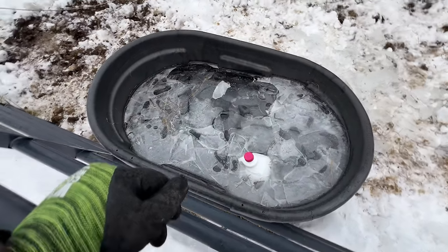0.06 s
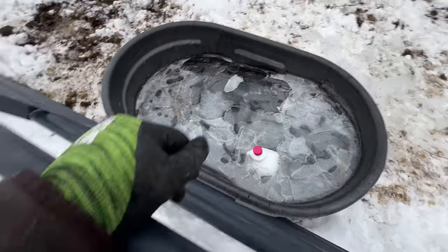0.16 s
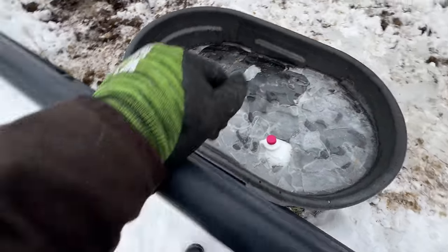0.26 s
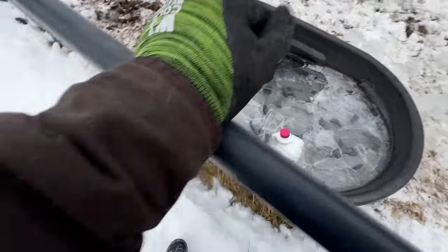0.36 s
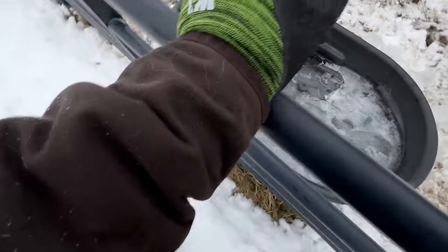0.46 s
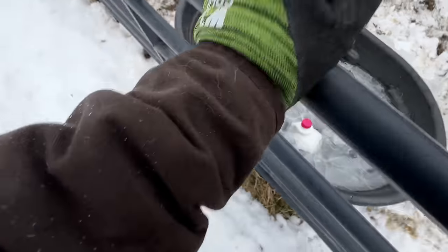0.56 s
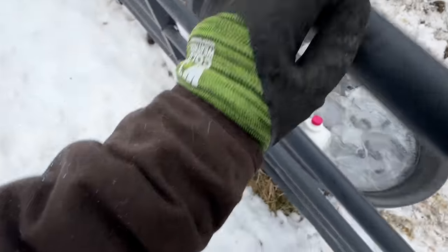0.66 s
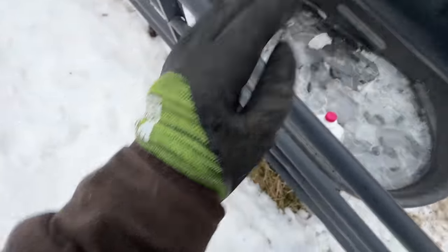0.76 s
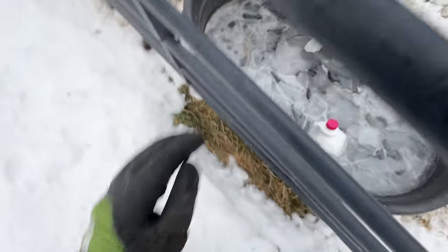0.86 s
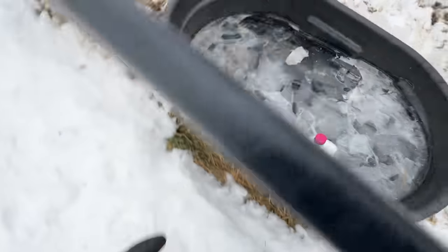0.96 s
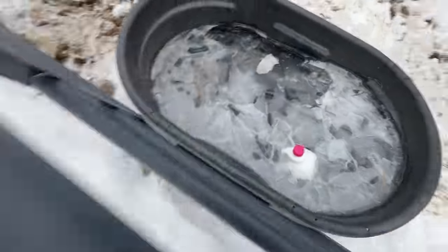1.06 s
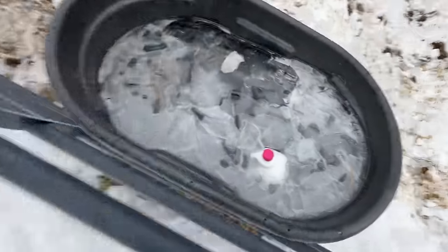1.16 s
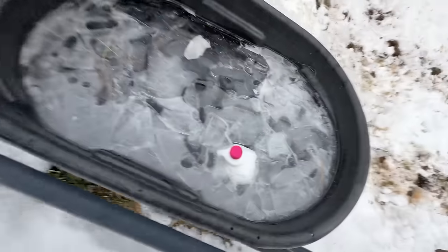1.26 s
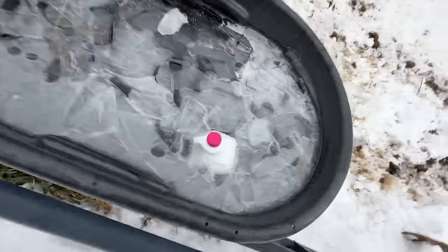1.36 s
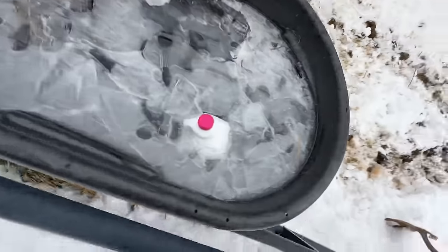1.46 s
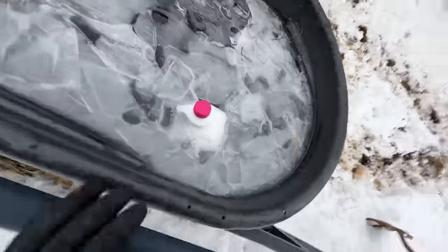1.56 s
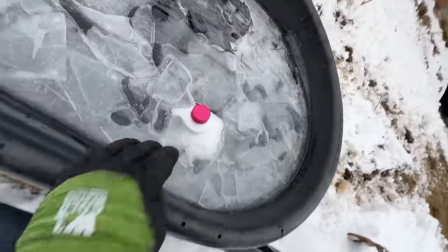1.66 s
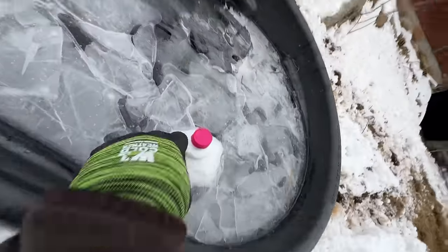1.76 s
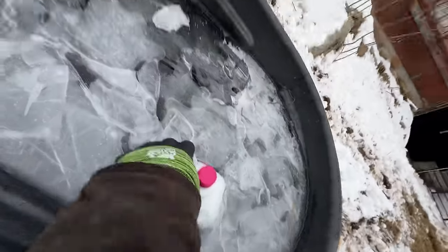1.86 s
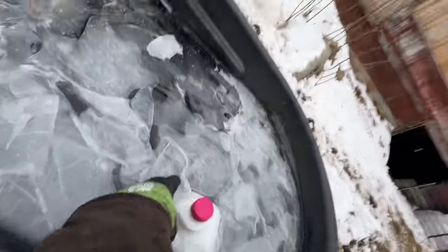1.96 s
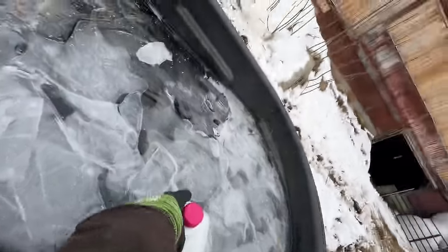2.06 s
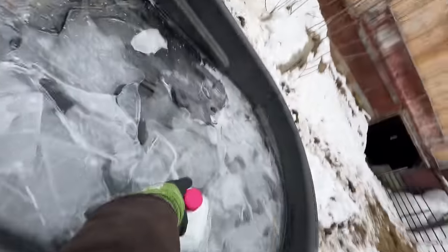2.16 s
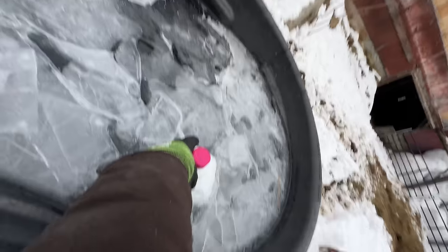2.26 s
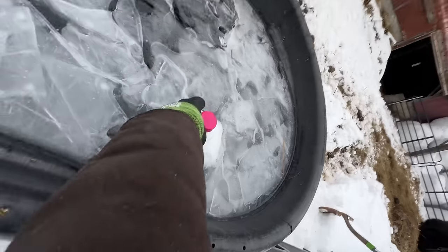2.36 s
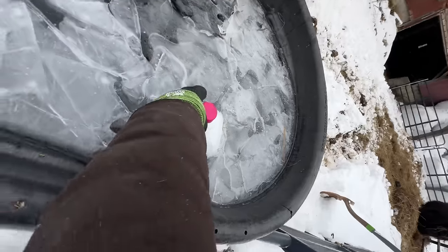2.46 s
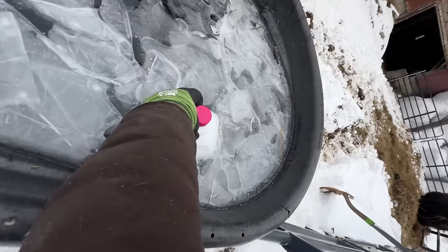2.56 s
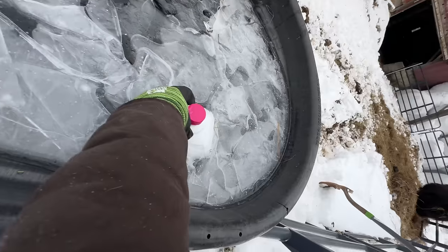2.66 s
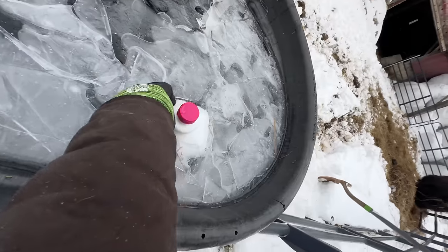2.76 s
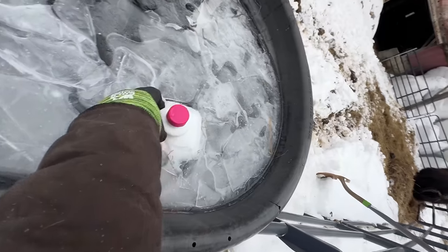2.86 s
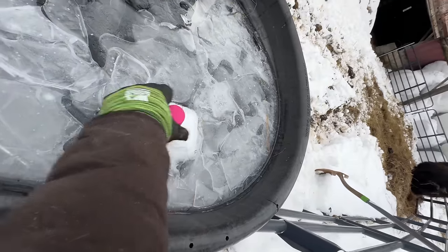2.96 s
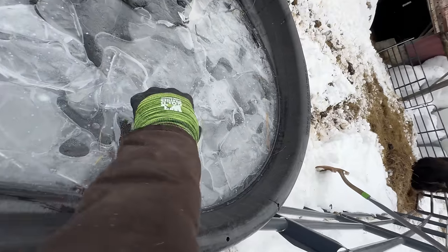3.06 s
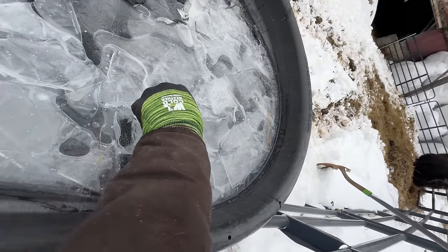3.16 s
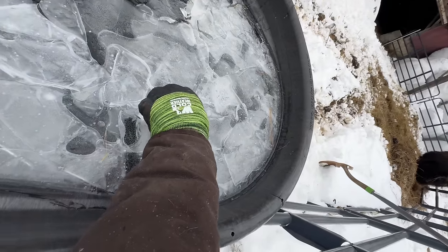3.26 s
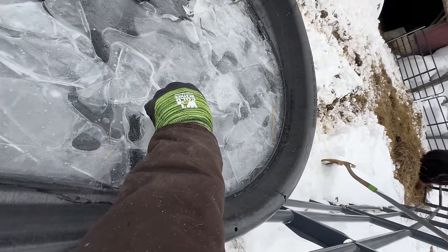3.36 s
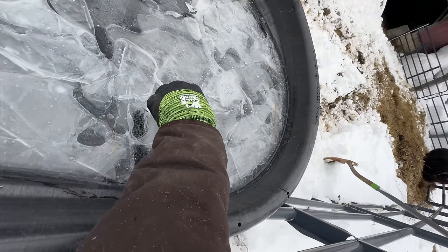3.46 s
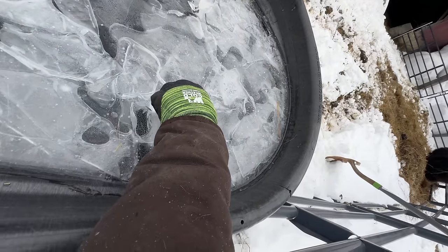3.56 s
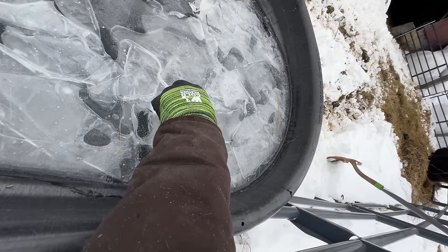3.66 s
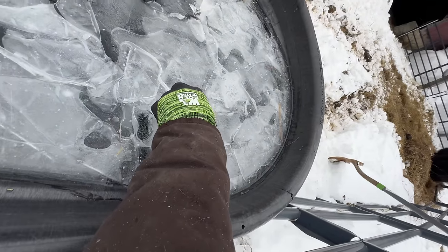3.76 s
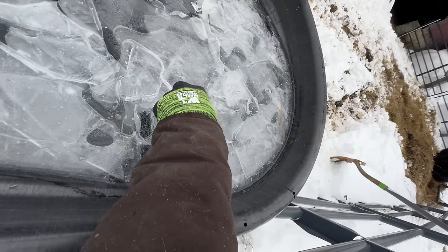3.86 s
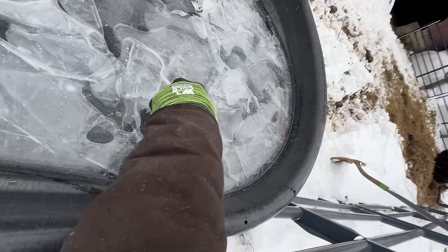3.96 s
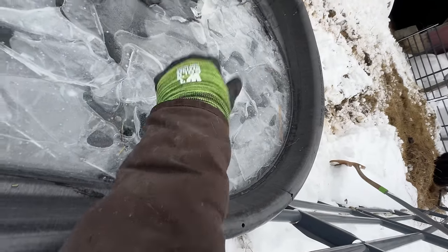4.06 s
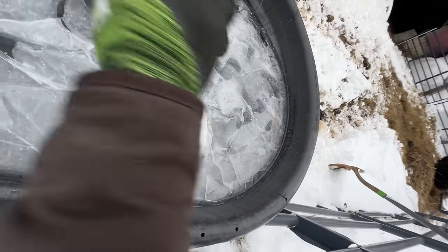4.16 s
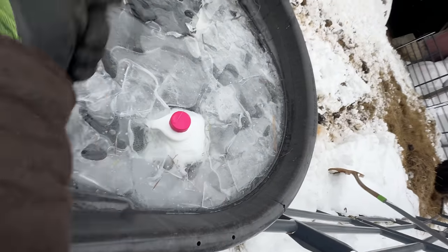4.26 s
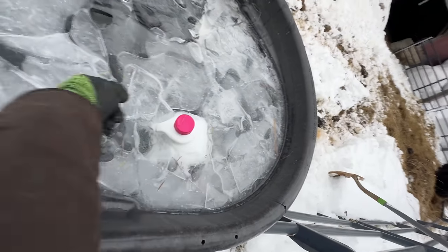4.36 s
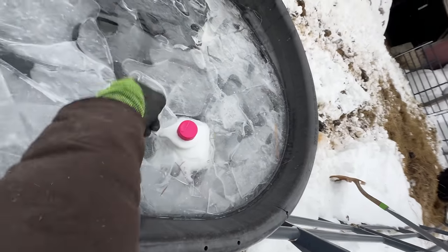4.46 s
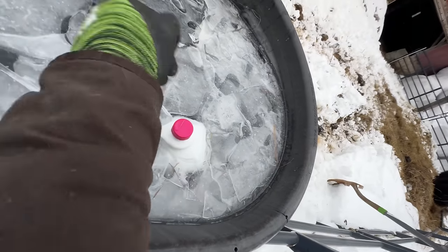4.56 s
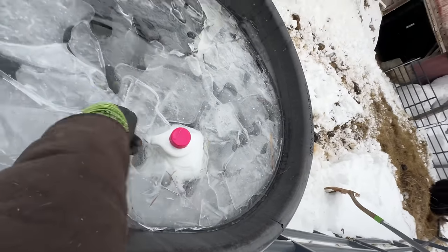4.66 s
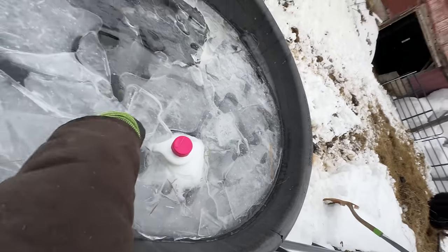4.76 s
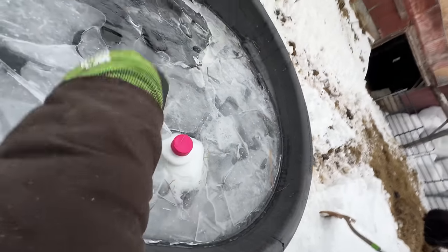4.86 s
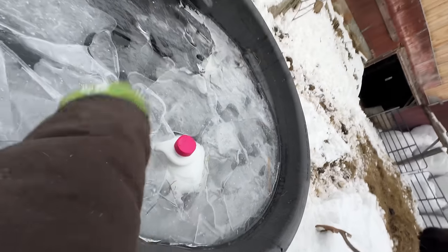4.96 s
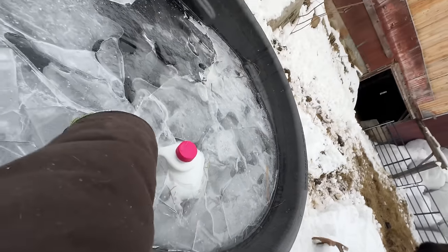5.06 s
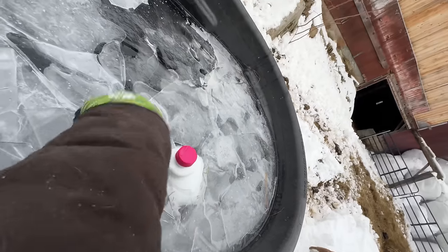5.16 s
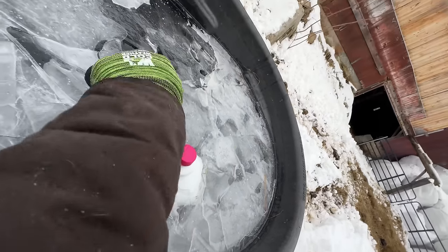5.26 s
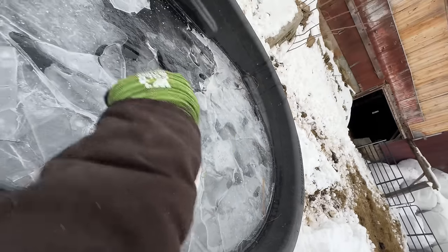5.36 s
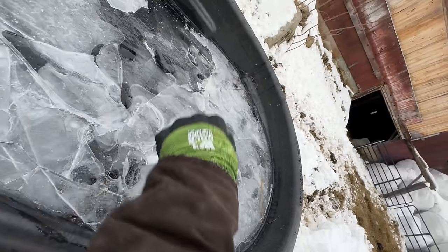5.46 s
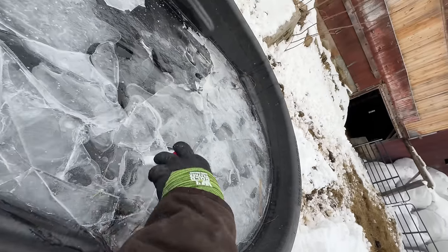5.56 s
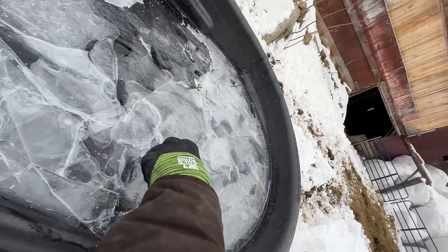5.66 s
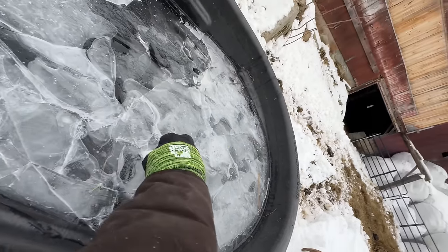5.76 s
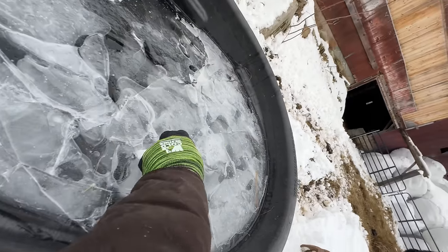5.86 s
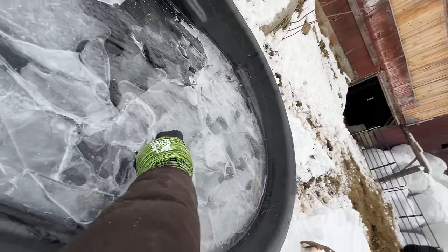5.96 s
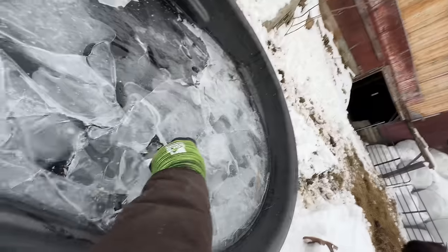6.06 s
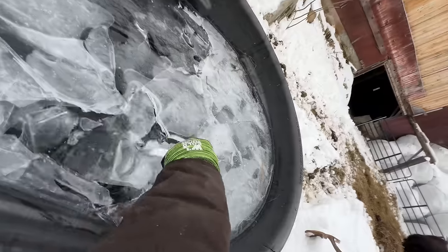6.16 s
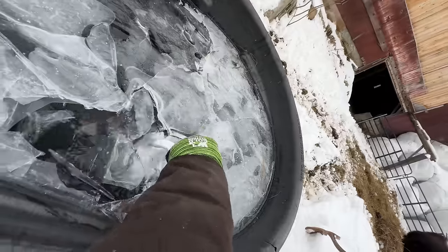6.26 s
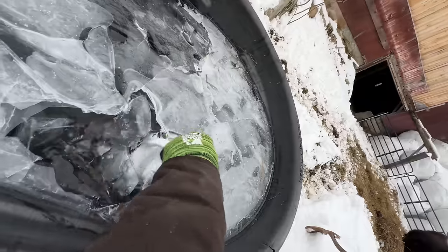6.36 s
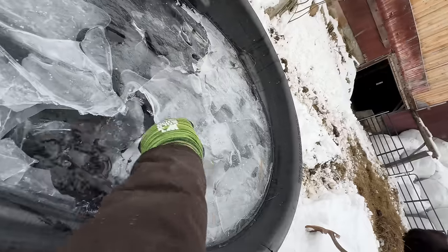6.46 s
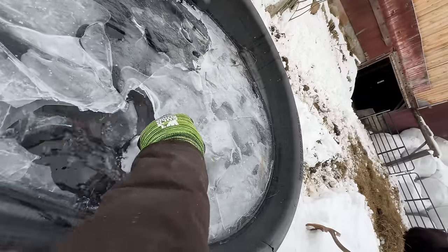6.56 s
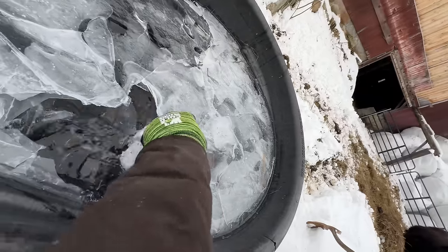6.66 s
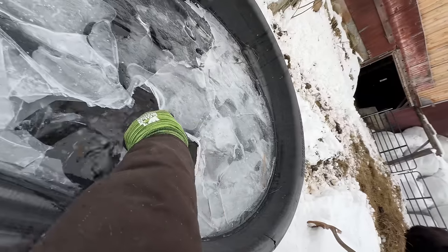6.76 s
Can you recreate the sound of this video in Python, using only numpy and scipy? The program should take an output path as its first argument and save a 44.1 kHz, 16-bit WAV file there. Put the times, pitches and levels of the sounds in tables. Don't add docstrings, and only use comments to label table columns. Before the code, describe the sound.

A sleeve and glove rustle and tap close by, a jug squeaks briefly, then three hard blows crack trough ice into clinking, sloshing slabs.

```python
import sys
import numpy as np
from scipy import signal
from scipy.fft import rfft, irfft, next_fast_len
from scipy.io import wavfile
from scipy.ndimage import uniform_filter1d

SR = 44100
rng = np.random.default_rng(int(sys.argv[2]) if len(sys.argv) > 2 else 0)


def boost(x):
    u = np.asarray(x, float) / 20
    return 10 ** u


def output_pcm(signal):
    pcm = np.clip(np.atleast_2d(signal).T, -1, 1) * 32767
    wavfile.write(sys.argv[1], SR, np.round(pcm).astype(np.int16))


N = 300762

# time_s, level_db
RUB_EFFORT = [(0.0, -59), (0.23, -48.5), (0.5, -50), (0.63, -47), (0.83, -44), (1.05, -43.5), (1.1, -56.5),
              (1.3, -59), (1.5, -59), (1.6, -46.5), (1.8, -47), (2.33, -53), (2.69, -51.5), (2.8, -45.5),
              (3.12, -51.5), (3.42, -53), (3.6, -59), (4.0, -51.5), (4.35, -47)]
# start_s, peak_db, t60_s, brightness_db
SCUFF_EVENTS = [(0.275, -38, 0.12, -4), (0.551, -54.5, 0.51, 29), (0.6994, -41, 0.15, 4),
                (0.96, -44, 0.083, 20), (1.003, -44, 0.33, 23), (1.137, -22.5, 0.14, -2),
                (1.1505, -24.5, 0.26, -0.5), (1.264, -18.5, 0.17, -1), (1.2825, -34, 0.08, 1),
                (1.332, -19.5, 0.14, -1.5), (1.382, -21, 0.33, -2.5), (1.439, -25, 0.16, 8),
                (1.485, -22.5, 0.12, -2.5), (1.582, -31.5, 0.045, 10.5), (1.9749, -40, 0.2, -8),
                (2.097, -35.5, 0.17, 2), (2.5, -44.5, 0.25, -18), (2.98, -33.5, 0.21, 7),
                (3.1074, -25.5, 0.083, -4), (3.146, -28.5, 0.12, -6), (3.2932, -41, 0.084, -6),
                (3.361, -29, 0.067, 6.5), (3.495, -30.5, 0.052, 7), (3.598, -38.5, 0.44, -0.5),
                (4.068, -29, 0.093, 6)]
# frequency_hz, level_db
CLOTH_SPECTRUM = [(1000, 8), (1600, 1), (2600, 3), (4000, 1.5), (6500, -0.5), (9000, -2.5), (12000, -6),
                  (14000, -6), (16000, -2)]
# frequency_hz, density_db (per Hz)
SLEEVE_BODY_SPECTRUM = [(180, -12.5), (280, 1), (450, -3), (650, -5), (800, -12), (1000, -14)]
# frequency_hz, density_db (per Hz)
THUMP_SPECTRUM = [(25, -44), (45, 3.5), (80, -2), (125, -2.5), (200, -3)]
# start_s, peak_db, pitch_hz, t60_s
TAP_EVENTS = [(0.539, -59, 93, 0.11), (0.716, -33, 280, 0.25), (0.8, -31.5, 216, 0.11),
              (0.886, -34, 256.5, 0.056), (1.053, -35, 254, 0.097), (1.137, -29.5, 310, 0.055),
              (1.172, -28.5, 267, 0.11), (1.26, -26, 273, 0.09), (1.322, -29.5, 400, 0.2),
              (1.382, -28.5, 301, 0.15), (1.426, -30, 227, 0.15), (1.576, -35, 104, 0.074),
              (1.966, -30.5, 118.5, 0.28), (2.096, -38, 348, 0.045), (2.699, -30.5, 230, 0.45),
              (3.018, -40, 494, 0.3), (3.092, -35, 510, 0.089), (3.806, -29.5, 666, 0.026)]
# start_s, peak_db, pitch_hz, t60_s, upper_mode_tilt_db
BLOW_EVENTS = [(4.356, 0, 123, 0.19, 1.5), (4.682, 1.5, 350.8, 0.024, 2), (5.024, -1.5, 293, 0.068, -2),
               (5.031, -1.5, 106, 0.03, 0), (5.786, -27, 317, 1, -6), (5.939, 0, 179, 0.12, 0),
               (5.997, -5, 426, 0.097, 1.5), (6.018, -12, 345.4, 0.11, -10), (6.057, -16, 407, 0.16, 4),
               (6.2, -18.5, 153, 0.5, 10), (6.283, -14.5, 327, 0.25, 24), (6.401, -22.5, 144, 0.33, -9),
               (6.422, -28.5, 160, 0.14, 18.5), (6.501, -10.5, 153.6, 0.42, 1.5),
               (6.571, -16, 176, 0.23, 9), (6.685, -23, 416, 0.27, -3)]
# pitch_hz, level_db, t60_s
TUB_MODES = [(63.5, -26, 0.14), (119, -32, 0.093), (138, -8.5, 0.21), (193, -26, 0.1), (230, -0.5, 0.033),
             (297, -4, 0.057), (321.5, 3.5, 0.1), (363.4, -0.5, 0.15), (439, -8.5, 0.074),
             (526, -0.5, 0.038), (576, 5, 0.013), (609, 3, 0.025), (800, -9, 0.038), (900, -3.5, 0.076)]
# start_s, peak_db, pitch_hz, t60_s
NUDGE_EVENTS = [(.81, -44, 252, .04), (.895, -28.5, 297, 0.027), (.892, -35, 2600, .02),
                (.965, -36, 250, 0.066), (1.049, -34.5, 3570, 0.041), (1.055, -36, 230, .05),
                (1.139, -31, 317, .04), (1.26, -33.5, 2100, 0.037), (1.261, -27.5, 250, 0.058),
                (1.266, -43, 4020, .04), (1.436, -37, 3280, .03), (1.78, -38, 200, 0.059),
                (2.738, -30, 194, .05), (2.76, -35, 645, 0.084), (2.86, -33, 802, 0.21),
                (3.014, -33.5, 495, 0.11), (2.78, -33, 2700, .15), (4.087, -29.5, 3400, 0.042),
                (4.085, -30, 4960, 0.032)]
# start_s, peak_db, centre_hz, t60_s
SNAP_EVENTS = [(0.8913, -24, 1270, 0.014), (1.048, -27, 970, 0.051), (1.1242, -30.5, 1700, 0.031),
               (1.283, -10, 7340, 0.045), (2.6985, -38, 1800, 0.024), (3.0866, -29, 2150, 0.045),
               (3.2324, -38, 2500, 0.025), (6.2156, -19, 5600, 0.034), (3.801, -24, 2600, 0.027),
               (3.8, -10, 13000, 0.034), (4.3, -28, 10000, 0.03), (0.82, -36, 2300, 0.015),
               (1.051, -39, 3000, 0.025), (4.351, -12, 11000, 0.022), (6.619, -21, 7100, 0.033),
               (6.1720, -14, 6000, 0.03), (6.382, -21, 4000, 0.04), (4.0863, -19, 3360, 0.047),
               (4.356, -18, 1300, 0.06), (4.349, -5.5, 4820, 0.027), (4.6841, -8.5, 3100, 0.021),
               (2.093, -38, 1510, 0.04), (5.022, -9.5, 3100, 0.047), (5.7896, -29, 1200, 0.07),
               (5.855, -30, 1500, 0.021), (5.902, -23, 2970, 0.089), (6.078, -14, 6200, 0.035),
               (6.1724, -39, 1800, 0.025), (6.283, -20, 4600, 0.024), (6.454, -18, 6400, 0.028),
               (6.6394, -30, 7310, 0.023), (6.688, -16.5, 7700, 0.022), (5.579, -23, 3400, 0.03),
               (6.1, -38, 2000, 0.04), (5.76, -40, 1700, 0.03), (5.89, -25, 1800, 0.03),
               (4.086, -34, 1700, 0.04), (2.696, -38, 2000, 0.03), (6.546, -23, 6000, 0.03)]
# time_s, level_db
DRAG_LEVEL = [
    (2.68, -94),
    (2.696, -42),
    (2.76, -35),
    (2.88, -36),
    (2.9, -43.5),
    (2.97, -47.5),
]
# time_s, lowest_hz, second_hz, third_hz
JUG_GLIDES = [(2.691, 331, 1400, 2340), (2.75, 450, 1420, 2210), (2.765, 647.6, 1487, 2600),
              (2.801, 742.6, 1698, 2660), (2.863, 822, 1897, 2850), (2.969, 900, 1740, 2610)]
# half_width_hz, level_db
JUG_RESONANCES = [(160, -1.5), (220, -1.5), (150, -1.5)]
# start_s, peak_db, pitch_hz, t60_s
SQUEAK_EVENTS = [(2.945, -50, 4300, .2), (3.012, -35, 497, 0.094), (6.285, -27, 3900, 0.083),
                 (6.095, -31, 2800, .1), (6.30, -30, 2950, .15), (6.285, -24.5, 910, 0.075),
                 (6.33, -31.5, 2000, 0.054), (6.13, -27, 3100, 0.055), (6.658, -37, 4360, 0.043),
                 (6.455, -30, 4650, 0.034), (6.39, -34, 3300, 0.054)]
# start_s, peak_db, t60_s, brightness_db
FIST_CRACK_EVENTS = [(3.7993, -11, 0.051, 9.5), (3.832, -33.5, 0.043, 17.5), (3.844, -28, 0.07, 10.5),
                     (4.359, -0.5, 0.08, -27), (4.415, -17, 0.065, -20), (4.469, -22.5, 0.078, -5),
                     (4.52, -36, 0.13, 4), (4.67, -9.5, 0.15, -3.5), (4.6814, -1.5, 0.099, 0.5),
                     (4.6987, -9, 0.11, -20), (4.738, -23, 0.1, 2.5), (4.788, -30.5, 0.14, 2),
                     (5.013, -13.5, 0.47, -3.5), (5.02, -1, 0.11, 4.5), (5.06, -23, 0.47, 5),
                     (5.138, -15.5, 0.06, -1.5), (5.28, -39, 0.093, -29)]
# start_s, peak_db, t60_s, brightness_db
BREAKUP_EVENTS = [(5.453, -48, 0.11, -6), (5.552, -30, 0.058, -8), (5.579, -19, 0.043, -5.5),
                  (5.697, -36.5, 0.068, 23), (5.789, -17, 0.3, 2), (5.8495, -16.5, 0.64, -1.5),
                  (5.920, -11, 0.31, 12), (5.932, -1, 0.066, -4), (5.9605, 1, 0.12, -5),
                  (5.992, -17, 0.056, 16), (6.0064, -11.5, 0.18, 9.5), (6.054, -26, 0.046, 17),
                  (6.078, -16.5, 0.15, 15), (6.095, -17.5, 0.3, 14), (6.17, -23, 0.13, 19),
                  (6.2007, -18.5, 0.18, 7), (6.28, -0.5, 0.2, -5), (6.2365, -20, 0.048, 6),
                  (6.382, -14.5, 0.083, 3), (6.529, -19, 0.03, 6), (6.41, -17.5, 0.063, 8),
                  (6.4537, -10.5, 0.19, 1.5), (6.495, -5, 0.24, 1.5), (6.552, -13.5, 0.17, 11),
                  (6.575, -8, 0.14, -0.5), (6.617, -17, 0.037, 14), (6.632, -28, 0.024, 17),
                  (6.685, -17.5, 0.11, -10)]
# frequency_hz, level_db
ICE_SPECTRUM = [(1000, 2), (1600, -7.5), (2800, 7), (4200, -0.5), (6500, 0.5), (9000, -1), (12000, 1),
                (14000, -5.5), (16000, -4)]
# start_s, peak_db, pitch_hz, t60_s
SLAB_RINGS = [(4.354, -23, 920, 0.069), (4.356, -13, 526, 0.064), (4.362, -11.5, 117, 0.23),
              (4.364, -19, 155, 0.27), (4.371, -13, 403.4, 0.11), (4.684, -13.5, 549, 0.07),
              (4.685, -11, 349.5, 0.089), (4.69, -19.5, 720, 0.075), (4.70, -23.5, 430, 0.12),
              (4.695, -19, 228, 0.16), (4.70, -32, 135, 0.2), (4.695, -27, 117.8, 0.27),
              (5.023, -21, 873, 0.14), (5.028, -18, 592, 0.056), (5.029, -9.5, 190, 0.062),
              (5.034, -15, 130, 0.15), (5.137, -35, 454, 0.045), (5.552, -35.5, 651, 0.087),
              (5.937, -13, 430, 0.048), (5.946, -6.5, 175.6, 0.057), (5.994, -17, 430, .04),
              (5.997, -23, 220, 0.18), (6.032, -28, 150, .05), (6.068, -23, 182, 0.038),
              (6.288, -23, 310, 0.15), (6.396, -25.5, 149, 0.14), (6.424, -24.5, 329, 0.09),
              (6.426, -18, 150, 0.084), (6.481, -20, 124, 0.13), (6.506, -17, 333, 0.061),
              (6.506, -15, 151, 0.065), (6.571, -25, 180, 0.052), (6.57, -27, 654, 0.2),
              (6.63, -24, 147, 0.22), (6.688, -26, 440, 0.053), (6.49, -19, 284, 0.15)]
# start_s, peak_db, pitch_hz, t60_s
SHARD_RINGS = [(5.933, -30, 6450, 0.03), (5.933, -33, 9580, 0.05), (5.933, -33, 5780, 0.05),
               (5.936, -16, 2970, 0.027), (5.936, -17.5, 1520, 0.02), (5.936, -28, 4820, 0.03),
               (5.96, -26, 2340, 0.03), (5.96, -23, 1085, 0.04), (5.965, -27, 4350, 0.21),
               (5.963, -19.5, 864, 0.051), (5.96, -29, 3400, 0.03), (5.993, -24, 4070, 0.14),
               (5.993, -23, 2570, 0.11), (5.993, -35, 9600, 0.17), (5.995, -19.5, 5940, 0.04),
               (6.008, -14.5, 6560, 0.036), (6.005, -22, 1506, 0.045), (6.008, -20, 6820, 0.04),
               (6.01, -23.5, 2040, 0.04), (6.008, -25, 4020, 0.04), (5.998, -23, 5000, 0.03),
               (6.008, -24, 3270, 0.05), (6.01, -37, 9050, 0.04), (6.08, -31, 4280, 0.13),
               (6.083, -32, 6000, 0.03), (6.093, -30, 3020, 0.11), (6.093, -25, 2160, 0.027),
               (6.095, -34, 6500, 0.04), (6.095, -34, 7320, 0.05), (6.108, -26, 3620, 0.063),
               (6.282, -25.5, 1958, 0.044), (6.287, -21.5, 3830, 0.047), (6.285, -26, 1250, 0.07),
               (6.315, -25, 3860, 0.027), (6.554, -33, 9300, 0.15), (6.569, -31, 3760, 0.1)]
# time_s, level_db
STIR_LEVEL = [(4.355, -25), (4.49, -53.5), (4.64, -54), (4.83, -56), (5.0, -62.5), (5.17, -48),
              (5.38, -60.5), (5.47, -47), (5.6, -44), (5.83, -42), (6.02, -23), (6.11, -31.5),
              (6.31, -35.5), (6.44, -39), (6.57, -32.5), (6.7, -34.5), (6.82, -43)]
# frequency_hz, density_db (per Hz)
WATER_SPECTRUM = [(180, -10.5), (300, 0), (500, -2), (800, -2.5), (1250, -14.5)]
# frequency_hz, from_trough (0-1), from_sleeve (0-1)
SIDE_SCATTER = [(100, 1, 0.5), (400, 1, 0.97), (900, 0.1, 1), (2500, 0.16, 1), (5000, 0.7, 1),
                (12400, 0.7, 1)]
# frequency_hz, difference_db
PORT_BIAS = [(60, 1.5), (180, 1.0), (550, 2.0), (1650, -0.5), (4970, 0.0), (15000, 0.5)]
# frequency_hz, side_gain_db
MID_NULL = [(10300, 0), (10550, 35), (13300, 35), (13900, 0)]
# frequency_hz, ratio_db
TROUGH_WIDTH = [(60, -14), (150, -31), (300, -15.5), (700, -6), (1300, -1), (1800, -12), (2800, 3.5),
                (4000, -4.5), (4700, 0), (7500, -0.5), (10000, 2.5), (16000, -20)]
# frequency_hz, ratio_db
SLEEVE_WIDTH = [(60, -1.5), (250, 0.5), (600, 6), (1300, 0.5), (1900, 1), (2800, 1), (4000, -2),
                (4700, 4.5), (7500, 1.5), (10000, 2.5), (16000, -1)]

USUAL_EFFORT_DB = -52
BODY_DB, BODY_FOLLOWS, THUMP_DB, THUMP_FOLLOWS = -53, 0.93, -57, 0.85
RUB_BRIGHT_DB, BRIGHT_FOLLOWS = -1.5, 0.48
WEAVE_HZ, WEAVE_DB = 2400, -60
SCUFF_RISE_S, SCUFF_HZ, SCUFF_BODY_DB, SCUFF_THUMP_DB = 0.017, 2967, -14, -17.5
TAP_CONTACT_S, TAP_TILT_DB, BLOW_CONTACT_S = 0.023, -4.5, 0.03
DRAG_HISS_HZ, DRAG_HISS_DB, DRAG_LOW_DB, DRAG_RASP_HZ, DRAG_RASP_DB = 8300, -8.5, -5, 3600, -6
SHARD_HZ, SHARD_DB, SHARD_OCTAVES_PER_DB = 2772, -18, 0.5
USUAL_STIR_DB = -40
CRUNCH_DB, CRUNCH_FOLLOWS, BOOM_DB, BOOM_FOLLOWS = -44, 0.99, -45.5, 0.72
WALL_DB, WALL_T60_S = -24, 0.32
SAG_SHARE, SAG_S, SLAB_DB, SHARD_RING_DB = 0.33, 0.0035, 0, 2.5
SLEEVE_LEFT_DB, TOP_HZ = 1.14, 15800


def in_time(rows):
    time_s, *columns = np.transpose(rows)
    return [np.interp(np.arange(N) / SR, time_s, c, left=-120, right=-120) for c in columns]


def at_hz(points, hz, axis=1):
    points = np.array(points, float)
    return np.interp(np.log(hz), np.log(np.maximum(points[:, 0], 20)), points[:, axis])


def rms_one(x):
    return x / np.sqrt(np.mean(x ** 2) + 1e-20)


def drift(rate_hz):
    r = np.exp(-80 * np.pi * rate_hz / SR)
    slow = signal.lfilter([1], [1, -2 * r, r * r], rng.standard_normal(N // 40 + 2002))[2000:]
    return np.interp(np.arange(N) / 40, np.arange(len(slow)), rms_one(slow))


def ring(x, hz, t60):
    r = boost(-60 / (max(t60, .0005) * SR))
    w = 2 * np.pi * hz / SR
    return signal.lfilter([0, np.sin(w)], [1, -2 * r * np.cos(w), r * r], x + 1e-18)


def grains(per_s, uneven_db, size=N):
    sizes = boost(uneven_db * np.minimum(rng.exponential(1, size), 5)) * rng.choice([-1, 1], size)
    return rms_one(sizes * (rng.random(size) < per_s / SR))


def coloured(source, spectrum, patchy_db, flicker_hz):
    out, together = 0, drift(flicker_hz)
    lowest, highest = spectrum[0][0], spectrum[-1][0]
    edges = lowest * 2 ** np.arange(0, np.log2(highest / lowest) + .3, 1 / 3)
    for k, (low, high) in enumerate(zip(edges, edges[1:])):
        band = signal.sosfilt(signal.butter(2, [low, high], "band", fs=SR, output="sos"), source)
        flicker_db = patchy_db * (together + 0.36 * drift(flicker_hz))
        gain_db = at_hz(spectrum, np.sqrt(low * high)) + flicker_db
        out = out + (-1) ** k * boost(gain_db) * band
    return rms_one(out)


def burst(start_s, peak_db, rise_s, t60):
    t = np.arange(int(.35 * SR)) / SR
    shape = (1 - np.exp(-t / max(rise_s, 1e-4))) ** 2 * boost(-60 * t / np.clip(t60, .01, .4))
    first = int(start_s * SR)
    return first, (boost(peak_db) * shape / shape.max())[:N - first]


def paired(texture):
    return np.array([texture, np.roll(texture, N // 2)])


def sleeve():
    effort_db, = in_time(RUB_EFFORT)
    swing_db = effort_db - USUAL_EFFORT_DB
    fibres = paired(coloured(grains(9000, uneven_db=1.0), CLOTH_SPECTRUM, patchy_db=2.0, flicker_hz=17.8))
    coarse = signal.lfilter([.4], [1, -.6], fibres)
    fine = fibres - coarse
    body = paired(coloured(grains(2500, uneven_db=1.5), SLEEVE_BODY_SPECTRUM, patchy_db=2.5, flicker_hz=27.0))
    thump = paired(coloured(grains(1300, uneven_db=6.5), THUMP_SPECTRUM, patchy_db=1.5, flicker_hz=14))

    out = boost(effort_db) * (coarse + boost(RUB_BRIGHT_DB + BRIGHT_FOLLOWS * swing_db) * fine)
    out += boost(BODY_DB + BODY_FOLLOWS * swing_db) * body
    out += boost(THUMP_DB + THUMP_FOLLOWS * swing_db) * thump * (swing_db > -40)
    hand_motion = uniform_filter1d(thump[0] ** 2, 5000)
    out += boost(WEAVE_DB + swing_db / 2) * rms_one(ring(fine, WEAVE_HZ, .003) * hand_motion)

    dull = boost(SCUFF_BODY_DB + 12.5) * body + boost(SCUFF_THUMP_DB + 11.0) * thump
    for start_s, peak_db, t60, bright_db in SCUFF_EVENTS:
        first, shape = burst(start_s - 1.1 * SCUFF_RISE_S, peak_db - 12.5, SCUFF_RISE_S, t60)
        now = slice(first, first + len(shape))
        hiss = shape * (coarse[:, now] + boost(bright_db) * fine[:, now])
        out[:, now] += hiss + 0.0025 * ring(hiss, SCUFF_HZ, 0.03)
        out[:, now] += boost(-bright_db / 2) * shape * dull[:, now]
    return out


def knocks():
    out, length = np.zeros((2, N)), int(.4 * SR)
    soft = signal.butter(2, [70, 1300], "band", fs=SR, output="sos")
    t = np.arange(length) / SR
    hits = [(*tap, TAP_TILT_DB, TAP_CONTACT_S) for tap in TAP_EVENTS]
    hits += [(*blow, BLOW_CONTACT_S) for blow in BLOW_EVENTS]
    for start_s, peak_db, hz, t60, upper_db, contact_s in hits:
        pushes = rng.standard_normal((2, length)) * (rng.random((2, length)) < 900 / SR)
        pushes *= np.exp(-t / max(contact_s, .001))
        pushes *= 1 - np.exp(-t / 0.0044)
        pushes[:, 0] = 0.51
        early = pushes * np.exp(-t / .025)
        strength_db = rng.normal(0, 2, len(TUB_MODES))
        sound = 1.26 * ring(pushes, hz, t60)
        for (mode_hz, mode_db, mode_t60), extra_db in zip(TUB_MODES, strength_db):
            drive = early if mode_hz > 260 else pushes
            gain = boost(mode_db + extra_db + upper_db * np.sign(mode_hz - 260))
            sound += gain * ring(drive, mode_hz, min(mode_t60, t60))
        sound = signal.sosfilt(soft, sound)
        sound /= np.abs(sound).max(axis=1, keepdims=True)
        level_db = peak_db + (1.0 if start_s < 4.2 else -6.0)
        first = int(start_s * SR)
        out[:, first:first + length] += (boost(level_db) * sound)[:, :N - first]
    return out


def rings(rows, gain_db, sag):
    out = np.zeros((2, N))
    for start_s, peak_db, hz, t60 in rows:
        first, shape = burst(start_s - .003, peak_db + gain_db, 0.0024, t60)
        t = np.arange(len(shape)) / SR
        turns = hz * (t + sag * SAG_S * (1 - np.exp(-t / SAG_S)))
        out[:, first:first + len(shape)] += shape * np.sin(2 * np.pi * (turns + rng.random((2, 1))))
    return out


def snaps():
    out = np.zeros((2, N))
    for start_s, peak_db, hz, t60 in SNAP_EVENTS:
        first, shape = burst(start_s, 0, 0.0001, t60)
        spray = shape * rng.standard_normal((2, len(shape))) ** 3
        band = signal.butter(2, [hz * 0.7, min(hz * 1.72, .45 * SR)], "band", fs=SR, output="sos")
        snap = signal.sosfilt(band, spray)
        snap /= np.abs(snap).max(axis=1, keepdims=True)
        out[:, first:first + len(shape)] += boost(peak_db + 3.0) * snap
    return out


def drag():
    slips = paired(grains(1800, uneven_db=2.5))
    time_s, *glides = np.transpose(JUG_GLIDES)
    out = boost(DRAG_HISS_DB) * rms_one(ring(slips, DRAG_HISS_HZ, .0012))
    out += boost(DRAG_RASP_DB) * rms_one(ring(slips, DRAG_RASP_HZ, 0.00065))
    out += boost(DRAG_LOW_DB) * rms_one(ring(slips, 328, 0.025))
    for k, (glide_hz, (half_hz, db)) in enumerate(zip(glides, JUG_RESONANCES)):
        phase = 2 * np.pi * np.cumsum(np.interp(np.arange(N) / SR, time_s, glide_hz)) / SR
        low = signal.butter(2, half_hz, fs=SR, output="sos")
        stutter = signal.sosfilt(low, np.roll(slips, 5000 * k, axis=1))
        out += boost(db) * rms_one(stutter * np.cos(phase))
    return boost(in_time(DRAG_LEVEL)[0]) * rms_one(out)


def squeaks():
    out = np.zeros((2, N))
    for start_s, peak_db, hz, t60 in SQUEAK_EVENTS:
        first, shape = burst(start_s, peak_db, 0.0039, t60)
        tone = ring(rng.standard_normal((2, len(shape))), hz, .04)
        out[:, first:first + len(shape)] += shape * rms_one(tone)
    return out


def cracks(fractures):
    out = np.zeros((2, N))
    for start_s, peak_db, t60, bright_db in FIST_CRACK_EVENTS + BREAKUP_EVENTS:
        first, shape = burst(start_s, peak_db - 13.0, 0.0017, t60)
        shower = shape * fractures[:, first:first + len(shape)]
        dark = signal.lfilter([.4], [1, -.6], shower)
        hz = SHARD_HZ * 2 ** (SHARD_OCTAVES_PER_DB * bright_db)
        shard = .09 * boost(SHARD_DB) * (ring(shower, hz, .018) + .6 * ring(shower, hz * .62, .015))
        out[:, first:first + len(shape)] += dark + boost(bright_db) * (shower - dark) + shard
    return out


def dealt_rings(born, pitches, cycles, longest_s):
    dealt = rng.integers(0, len(pitches), N)
    for k, hz in enumerate(pitches):
        yield hz, ring(born * (dealt == k), hz, min(cycles / hz, longest_s))


def clinks():
    born = grains(700, uneven_db=1.0)
    return rms_one(sum(tone for _, tone in dealt_rings(born, np.geomspace(1100, 8000, 18), 100.0, .03)))


def slosh(stir_db):
    born = grains(260, uneven_db=2.0)
    gulps = sum(tone * 300 / hz for hz, tone in dealt_rings(born, np.geomspace(200, 1100, 14), 41.0, .04))
    churn = coloured(grains(3000, uneven_db=-2.0), WATER_SPECTRUM, patchy_db=2.0, flicker_hz=12.0)
    return boost(stir_db) * paired(0.51 * rms_one(gulps) + 0.79 * churn)


def wall_hum():
    kicks = np.zeros(N)
    for start_s, peak_db, *_ in BLOW_EVENTS:
        kicks[int(start_s * SR)] = boost(peak_db + WALL_DB)
    return signal.lfilter([1], [1, -boost(-60 / (WALL_T60_S * SR))], kicks)


def tub_boom():
    shoves = grains(130, uneven_db=2.0)
    boom = ring(shoves, 135.7, 0.1) + 0.37 * ring(shoves, 153.0, 0.16) + 0.21 * ring(shoves, 85, 0.19)
    return paired(rms_one(boom))


def trough():
    stir_db, = in_time(STIR_LEVEL)
    swing_db = stir_db - USUAL_STIR_DB
    crunch = coloured(grains(2800, uneven_db=2.2), ICE_SPECTRUM, patchy_db=3.0, flicker_hz=24.2)
    fractures = paired(0.58 * crunch + 0.35 * clinks())
    grinding = boost(CRUNCH_DB + CRUNCH_FOLLOWS * swing_db + 2.5) * fractures
    boom_level = boost(BOOM_DB + BOOM_FOLLOWS * swing_db) + wall_hum()
    out = grinding + slosh(stir_db) + boom_level * tub_boom()
    out += knocks() + cracks(fractures) + snaps() + drag() + squeaks()
    out += rings(SLAB_RINGS, SLAB_DB, SAG_SHARE) + rings(SHARD_RINGS, SHARD_RING_DB, 0)
    return out + rings(NUDGE_EVENTS, -0.83, 0.14)


def ports(pair, side_db, axis):
    size = next_fast_len(N + 4096)
    hz = np.maximum(np.arange(size // 2 + 1) * SR / size, 20)
    direct, twin = rfft(pair, size)
    share = np.clip(at_hz(SIDE_SCATTER, hz, axis=axis), 0, 1)
    ratio = boost(at_hz(side_db, hz) + at_hz(MID_NULL, hz))
    total = np.sqrt(1 + ratio ** 2)
    mid = direct / total
    side = (np.sqrt(share) * twin - 1j * np.sqrt(1 - share) * direct) * ratio / total
    bias = boost(np.array([[.5], [-.5]]) * at_hz(PORT_BIAS, hz))
    return irfft(np.array([mid + side, mid - side]) * bias, size)[:, :N]


def scene():
    lean = boost(np.array([[.5], [-.5]]) * SLEEVE_LEFT_DB)
    return lean * ports(sleeve(), SLEEVE_WIDTH, axis=2) + ports(trough(), TROUGH_WIDTH, axis=1)


def low_pass(x):
    return signal.sosfilt(signal.butter(12, 17130, fs=SR, output="sos"), x)


def record(dry):
    thin = signal.sosfilt(signal.butter(2, 70, "high", fs=SR, output="sos"), dry)
    rounded = 1.3 * np.tanh(thin / 1.3)
    mix = signal.sosfilt(signal.ellip(10, .5, 60, TOP_HZ, fs=SR, output="sos"), rounded)
    return low_pass(mix)


dry = scene()
out = record(dry)
output_pcm(out)
```